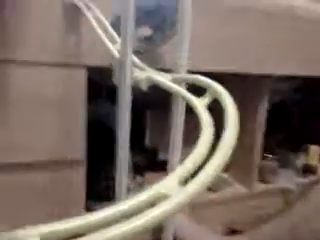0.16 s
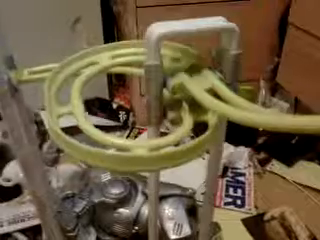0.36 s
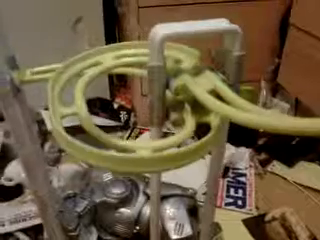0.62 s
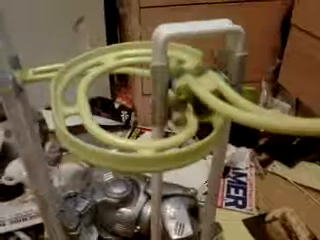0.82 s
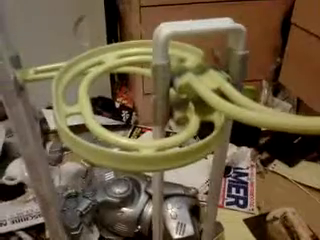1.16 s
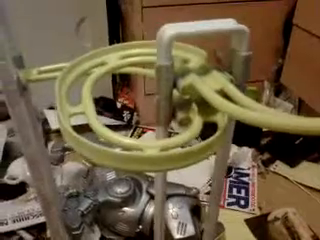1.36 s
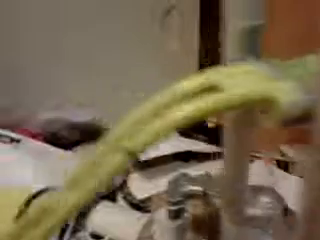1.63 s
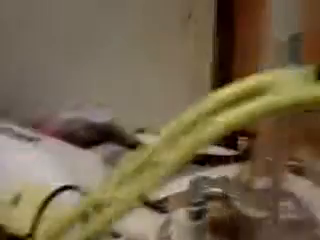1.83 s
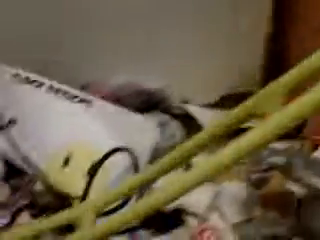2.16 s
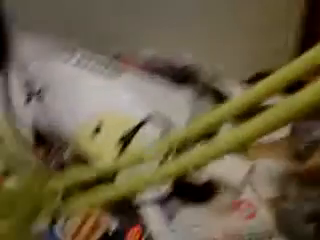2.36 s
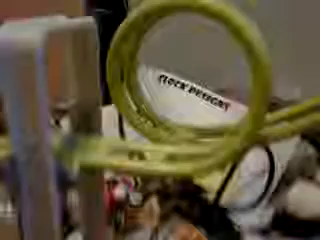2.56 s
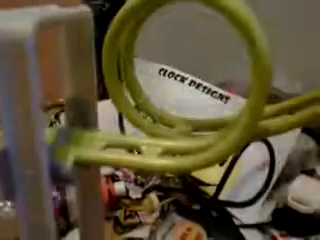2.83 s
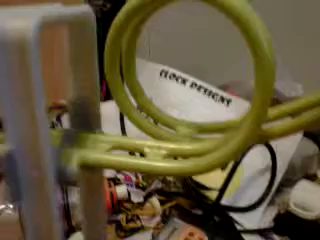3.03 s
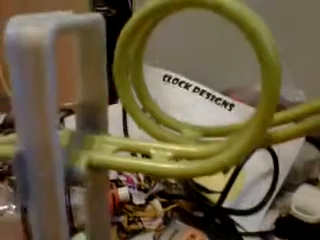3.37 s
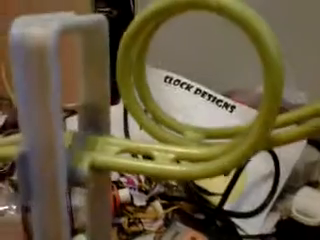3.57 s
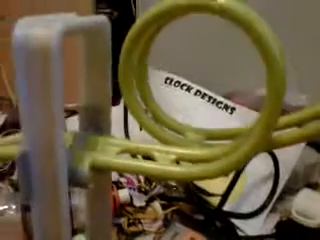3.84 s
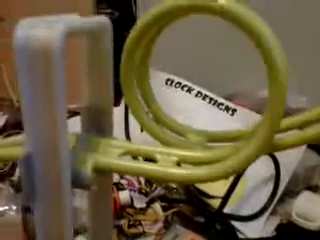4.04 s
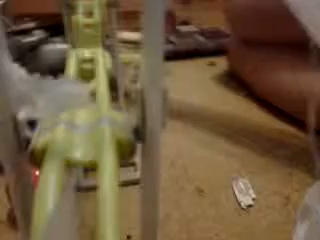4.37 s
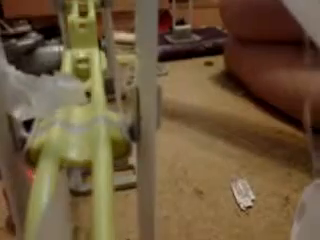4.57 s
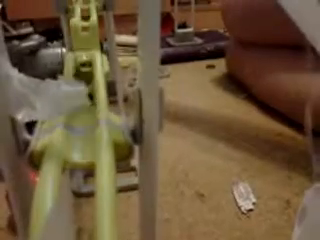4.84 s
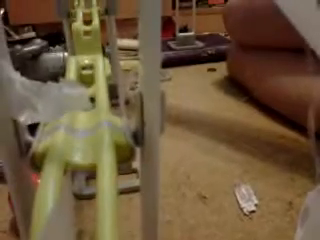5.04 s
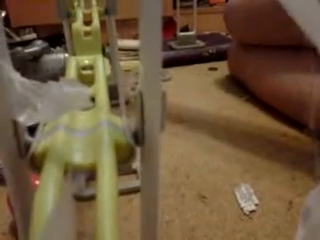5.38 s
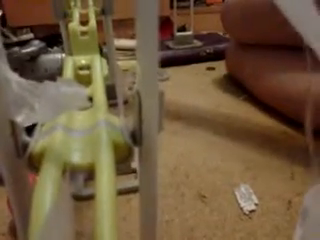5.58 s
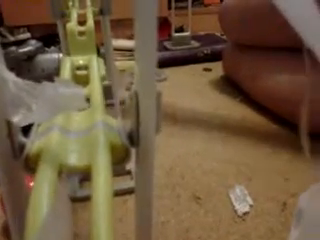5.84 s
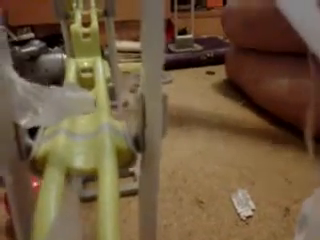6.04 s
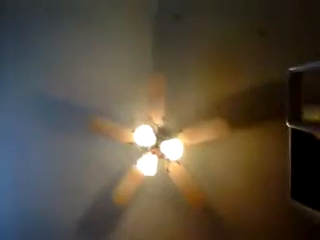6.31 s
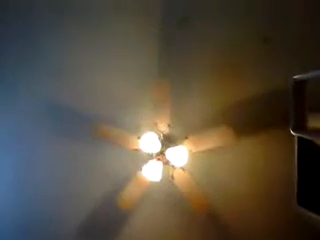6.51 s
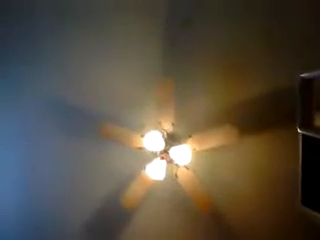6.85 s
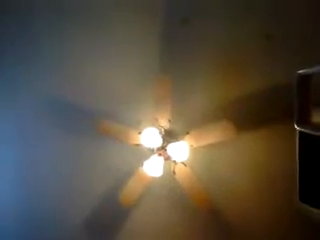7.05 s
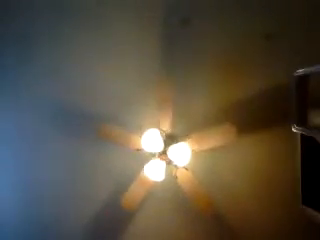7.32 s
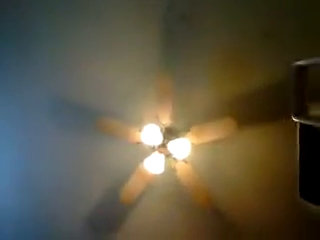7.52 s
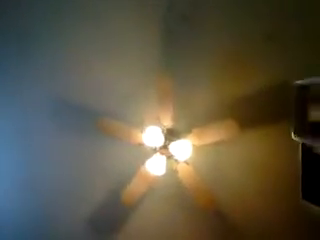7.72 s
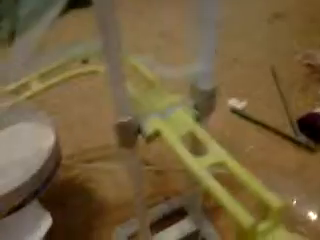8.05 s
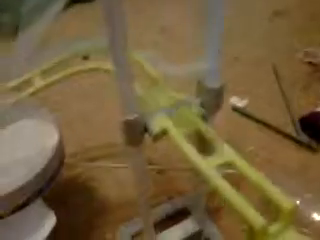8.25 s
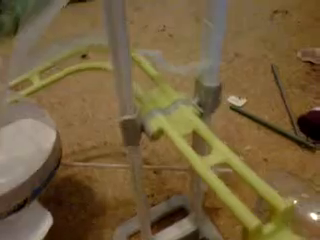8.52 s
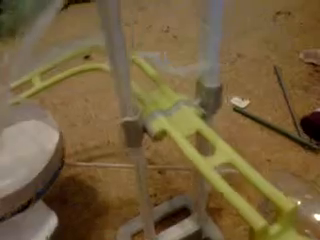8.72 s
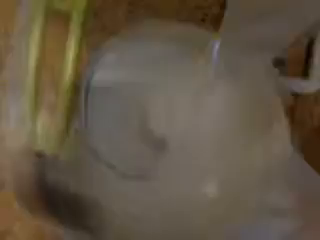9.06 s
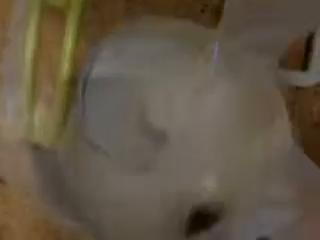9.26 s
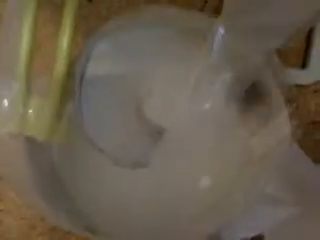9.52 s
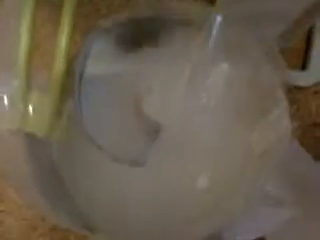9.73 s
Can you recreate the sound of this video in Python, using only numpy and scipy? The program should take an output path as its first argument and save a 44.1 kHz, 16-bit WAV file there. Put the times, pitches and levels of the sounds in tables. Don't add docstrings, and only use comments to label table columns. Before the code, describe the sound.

A small marble rumbles and clicks along a plastic rail track in a quiet room, with pops at camera cuts and hard knocks on the camera.

```python
import sys
import numpy as np
from scipy import signal
from scipy.fft import rfft, irfft
from scipy.io import wavfile
from scipy.ndimage import uniform_filter1d

SR = 44100
rng = np.random.default_rng(int(sys.argv[2]) if len(sys.argv) > 2 else 0)


def dump(signal):
    limited = np.clip(np.atleast_2d(signal).T, -1, 1)
    pcm = np.round(limited * 32767).astype(np.int16)
    wavfile.write(sys.argv[1], SR, pcm)


def field_ratio(decibels):
    return 10 ** (np.asarray(decibels, dtype=float) / 20)


N = 436149
HIT_N = 6000


def band(x, lo_hz, hi_hz, order=2):
    return signal.sosfilt(signal.butter(order, [lo_hz, hi_hz], "band", fs=SR, output="sos"), x)


def ring(x, hz, width_hz):
    return signal.lfilter(*signal.iirpeak(hz, hz / width_hz, fs=SR), x)


def casing(x, hz, width_hz):
    return ring(ring(x, hz, width_hz), hz, 1.05 * width_hz)


def unit(x):
    return x / np.sqrt(np.mean(x ** 2) + 1e-18)


def peak(x):
    return x / np.abs(x).max()


def walk(count, per_s):
    points = rng.standard_normal(int(count * per_s / SR) + 2)
    return 1.1 * np.interp(np.arange(count) * per_s / SR, np.arange(len(points)), points)


def grit(count, per_s, spread_db):
    when, sign, strength = rng.random((count, 3)).T
    hard = np.minimum(-np.log(1 - strength), 3.5)
    return (when < per_s / SR) * np.sign(sign - .5) * field_ratio(spread_db * hard)


def blow(t60, rebound=0.38):
    decay = np.exp(-np.log(1000) * np.arange(HIT_N) / SR / max(t60, .003))
    x = grit(HIT_N, 2500, 2.5) * rebound * decay
    x[0] = 1.25
    return x


def shots():
    edges = [0] + [int((r[0] - .003) * SR) for r in RESTARTS[1:]] + [N]
    return list(zip(edges, edges[1:]))


def place_at(s):
    return sum(a <= s * SR for a, _ in shots()) - 1


# frequency in Hz, level in dB per Hz.
AIR = [(24, -29), (40, -12), (86, 0), (342, -10), (399, -6), (720, -11), (3720, -23), (5280, -27.5),
       (7500, -11.5), (9750, -50), (16500, -120)]
AIR_DB = -67.5


def air():
    log_hz = np.log(np.arange(N // 2 + 1) * SR / N + 1)
    hz, db = np.array(AIR).T
    shape = field_ratio(np.interp(log_hz, np.log(hz), db))
    return field_ratio(AIR_DB) * unit(irfft(rfft(rng.standard_normal(N)) * shape, N))


def room_echo():
    t60_s, treble_t60_s, top_hz, floor_echo_s = 0.17, 0.13, 3000, 0.0061
    t = np.arange(int(.4 * SR)) / SR
    noise = rng.standard_normal(len(t)) * np.clip(t / 0.0021, 0, 1)
    tail = band(noise, 120, top_hz, order=1) * field_ratio(-60 * t / t60_s)
    tail += 0.45 * band(noise, 120, top_hz, order=1) * 0 + 0.45 * noise * field_ratio(-60 * t / treble_t60_s)
    tail = tail / np.sqrt(np.sum(tail ** 2))
    tail[int(floor_echo_s * SR)] += .35
    return tail


# frequency in Hz, width in Hz, level in dB.
TRACK = [
    [(403, 21, 13), (660, 310, 73), (1360, 290, -1), (2930, 33, 60), (3800, 110, 20), (5200, 150, 20)],
    [(430, 9.3, -15), (1215, 8.3, -2), (1660, 210, -8), (2760, 25, -23), (4130, 65, -12), (872, 27, 7),
     (615, 17, 30)],
    [(558, 61, 27.5), (1226, 33, 24.5), (1850, 9.3, -30), (2500, 270, -19), (4800, 61, -56)],
    [(1370, 60, 22.5), (1970, 64, 14.5), (3060, 35, 13), (5410, 200, 5.5)],
    [(337, 330, 24.5), (1190, 480, 20.5), (1403, 24, 28.5), (2860, 270, -2), (5170, 460, -48)],
    [(712, 110, 19.5), (1360, 22, 24.5), (1700, 33, 3), (2290, 65, 4), (3870, 230, 6.5)],
    [(621, 110, 43), (3930, 150, -19)],
]


def track(x, place, widen=2.5):
    return sum((-1) ** k * field_ratio(db) * ring(x, hz, widen * width_hz + 25)
               for k, (hz, width_hz, db) in enumerate(TRACK[place]))


THUD_DB = (-10.5, -9.5, -8.5, -11, -13, -12, -7)
# glassy tick of the marble in dB re peak, at 1500 Hz.
TICK_DB = (-18, -25, -9, -18, -6.5, -16.5, -2.5)


def frame_thud_db(s, db):
    return THUD_DB[place_at(s)] - 0.16 * (db + 27.5)


def glass_tick_db(s, hz):
    return TICK_DB[place_at(s)] + 5.5 * np.log2(hz / 1500)


def knock(s, db, hz, thud_db, tick_db, wet_db):
    hit = blow(.046 + .001 * wet_db, rebound=np.clip(.95 + .02 * wet_db, .25, .95))
    hit[0] = .7
    clack = peak(ring(ring(hit, hz, .5 * hz), hz, 6.3 * hz))
    clack = clack + field_ratio(-9.5) * peak(track(hit, place_at(s), widen=0.78))
    thud = ring(ring(hit, 340, 540), 110, 460)
    tick = band(hit, 3400, 6100) + 0.6 * casing(hit, 4816, 1200)
    sound = peak(band(clack, 490, 3200)) + field_ratio(thud_db) * peak(thud) + field_ratio(tick_db - 0.5) * peak(tick)
    sound = field_ratio(db) * sound
    return s, sound, field_ratio(min(wet_db, 4)) * sound


# start in seconds, peak in dB, pitch in Hz, thud in dB re peak.
RATTLES = [(.27, -51, 2310, -15), (.367, -44.5, 1350, -11), (3.71, -36.5, 2130, -36),
           (3.727, -37.5, 3080, -19), (4.496, -52.5, 1200, 16.5), (4.777, -32, 2587, -1),
           (5.224, -20, 1374, -23.5), (5.242, -35, 1456, -5.5), (5.258, -25.5, 2620, -28.5),
           (5.436, -28.5, 915, 2.5), (5.515, -41, 950, 4), (6.058, -39.5, 1270, -2), (6.064, -40, 2030, -3),
           (6.079, -45, 1342, -9), (7.481, -42, 3420, -24.5), (7.494, -38.5, 2560, -29),
           (3.748, -40, 2800, -21), (8.489, -38, 1980, -39), (8.513, -28.5, 1960, -10.5),
           (8.71, -33.5, 1970, -17), (8.73, -38.5, 1360, -17), (9.238, -51.5, 3200, -9),
           (9.479, -48, 806, -3.5)]


def rattles():
    return [knock(s, db, hz, thud_db, glass_tick_db(s, hz), -19) for s, db, hz, thud_db in RATTLES]


# start in seconds, peak in dB, pitch in Hz, room share in dB.
JOINTS = [(.286, -44, 1450, -12), (0.498, -36, 1010, -2.5), (0.944, -45, 727, 12), (.977, -41.5, 719, 2.5),
          (1.395, -39.5, 1350, -2.5), (1.431, -41, 937, -6.5), (2.021, -44, 1200, 0),
          (2.048, -45, 640, 7.5), (2.52, -45, 1750, -3), (2.718, -33, 640, -8), (2.968, -29.5, 2510, -12),
          (3.16, -30.5, 620, -8), (3.227, -41, 2910, -3.5), (3.482, -38, 1080, -1.5),
          (3.567, -38, 2740, -2.5), (4.675, -28, 1370, -14), (5.127, -31.5, 1380, 7),
          (5.212, -24.5, 1940, -14.5), (7.009, -30.5, 2580, -5.5), (7.531, -30, 2550, -21),
          (8.55, -35.5, 1360, 16), (8.694, -27, 1390, -27)]


def joints():
    return [knock(s, db, hz, frame_thud_db(s, db), glass_tick_db(s, hz), wet_db)
            for s, db, hz, wet_db in JOINTS]


# start in seconds, peak in dB, pitch in Hz, tick in dB re peak,
# room share in dB.
LANDINGS = [
    (.374, -35.5, 1190, -43, -50),
    (2.744, -30, 1750, -6, -16),
    (2.8, -30.5, 1720, -5, -13),
    (3.248, -28.5, 2500, 1, -6.5),
    (3.416, -22.5, 2500, -1, -8.5),
    (3.863, -24, 1850, -6, -5),
    (4.477, -24.5, 1500, -6.5, -47),
    (6.125, -28, 1850, -36, -24),
    (7.2907, -23, 2580, -3.5, -6.5),
    (8.391, -22.5, 1466, -10, -4.5),
]


def landings():
    return [knock(s, db, hz, frame_thud_db(s, db), tick_db, wet_db) for s, db, hz, tick_db, wet_db in LANDINGS]


# time in seconds, pop in dB, dip before it in dB, fall time in ms.
RESTARTS = [
    (0.4008, -22.5, -29.5, 1),
    (1.6602, -23, -39, 0.82),
    (2.8209, -22.5, -52, 0.77),
    (4.5226, -22.5, -34, 0.87),
    (6.4205, -22.5, -38.5, 0.83),
    (8.0429, -32.5, -23.5, 3.7),
    (9.2215, -27.5, -23, 2.8),
]


def pops():
    out, ms = np.zeros(N), np.arange(-1200, 9000) / SR * 1000
    after = np.clip(ms, 0, None)
    dip = (ms > -4.1) * np.exp(-np.clip(ms + 4.1, 0, None) / 1.4)
    tick = (ms > -24.3) * np.exp(-np.clip(ms + 24.3, 0, None) / 1.3)
    rise = np.exp(ms / 1.2) * (ms > -4.1)
    for s, db, dip_db, fall_ms in RESTARTS:
        fall = 1.3 * np.exp(-after / fall_ms) - .29 * np.exp(-after / 4.5) - .01 * np.exp(-after / 150)
        spike = np.where(ms < 0, rise, fall)
        i = int(s * SR) - 1200
        out[i:i + len(ms)] += field_ratio(db) * spike - field_ratio(dip_db) * dip - field_ratio(-41) * tick
    return uniform_filter1d(out, size=9)


# start
# in seconds, time the fade-out begins in seconds, level at start in dB, level as the fade-out # begins in dB.
RUNS = [(0.411, 0.93, -44.5, -53), (0.956, 1.06, -41, -51.5), (1.092, 1.405, -51.5, -48.5),
        (1.374, 1.46, -48, -48.5), (1.488, 1.654, -57.5, -41.5), (1.658, 2.24, -67.5, -61.5),
        (2.02, 1.86, -66, -46), (2.142, 2.556, -69.5, -39.5), (2.56, 2.68, -49, -42),
        (2.816, 3.04, -57.5, -43.5), (2.98, 3.09, -59, -44.5), (3.27, 3.08, -62, -66),
        (3.43, 3.74, -48.5, -53.5), (3.91, 4.34, -62.5, -70.5), (4.518, 4.78, -44.5, -43.5),
        (4.892, 5.5, -59, -53), (5.066, 5.246, -35, -39), (5.42, 6.04, -56.5, -55.5),
        (6.057, 6.405, -58.5, -70), (6.73, 7.003, -62.5, -42.5), (6.975, 7.181, -52.5, -42.5),
        (7.274, 7.292, -40, -69.5), (7.47, 7.5, -51.5, -42), (7.545, 7.777, -48.5, -43),
        (7.914, 7.56, -58, -46), (8.04, 8.09, -45, -39), (8.203, 8.2, -42, -43), (8.435, 8.7, -39, -42),
        (8.941, 9.2, -60, -59.5), (9.427, 9.84, -52, -52.5)]


def rails_level():
    touch_db_per_s, lift_db_per_s = 1496.5, 260.5
    t, out = np.arange(N) / SR, np.full(N, -120.)
    for start, end, first_db, last_db in RUNS:
        a, b = shots()[place_at((start + end) / 2)]
        db = np.interp(t[a:b], [start, end], [first_db, last_db])
        db -= touch_db_per_s * np.clip(start - t[a:b], 0, None)
        db -= lift_db_per_s * np.clip(t[a:b] - end, 0, None)
        out[a:b] = np.maximum(out[a:b], db)
    return out


RAILS_HZ = 864, 1350, 1500, 1750, 1450, 1600, 770
# frame rumble in dB re rails, for a run at -50 dB.
FRAME_DB = (-13, -12.5, -8, -9, -11.5, -11.5, -11)
# contact hiss in dB re rails, for a run at -50 dB.
HISS_DB = (-15, -9.5, 0.5, -7.5, -2, -15, -26)
MODES_DB = (-14, -4.5, -13, -10.5, -12.5, -14.5, -7.5)


def rolling():
    frame_hz, hiss_hz = 400, 3200
    port_hz, port_db, port_octaves = 5200, 4.5, 0.066
    rails_db = rails_level()
    place = np.repeat(np.arange(len(TRACK)), [b - a for a, b in shots()])
    frame_db = np.take(FRAME_DB, place) + 0.38 * (rails_db + 50) - 50
    hiss_db = np.take(HISS_DB, place) + 1.3 * (rails_db + 50) - 50

    def db_at(hz, mid_hz, now):
        low = np.clip(np.log(mid_hz / hz) / np.log(mid_hz / frame_hz), 0, 1)
        high = np.clip(np.log(hz / mid_hz) / np.log(hiss_hz / mid_hz), 0, 1)
        outside_db = 6.5 * max(np.log2(frame_hz / hz), 0) + 18.6 * max(np.log2(hz / hiss_hz), 0)
        outside_db -= port_db * np.exp(-(np.log2(hz / port_hz) / port_octaves) ** 2)
        blend_db = (1 - low - high) * rails_db[now]
        blend_db = blend_db + low * (frame_db[now] + 3.5) + high * (hiss_db[now] + 0.5)
        return blend_db - outside_db - 7.0

    seams = field_ratio(6.5) * grit(N, 120, 3.2)
    rough = (grit(N, 4000, 2.8) + seams) * field_ratio(1.5 * walk(N, 45))
    out = np.zeros(N)
    for modes, modes_db, mid_hz, (a, b) in zip(TRACK, MODES_DB, RAILS_HZ, shots()):
        now = slice(a, b)
        for k, hz in enumerate(110 * 2 ** (np.arange(25) / 4.2)):
            level_db = db_at(hz, mid_hz, now) + 2.5 * walk(b - a, 25)
            out[now] += (-1) ** k * field_ratio(level_db) * unit(ring(rough[now], hz, .18 * hz))
        for hz, width_hz, _ in modes:
            level_db = db_at(hz, mid_hz, now) + 3.5 * walk(b - a, 8) + modes_db - min(hz, 2500) / 500
            out[now] += field_ratio(level_db) * unit(ring(rough[now][::-1], hz, width_hz + 30))
    return out


# start in seconds, peak in dB, pitch in Hz, length in ms,
# room share in dB.
SKIDS = [(.49, -49.5, 5200, 24, -4), (.672, -53, 4970, 25, -7), (.96, -52, 4970, 17, -10),
         (4.7436, -24, 2500, 7.9, -6), (4.749, -21, 3060, 10.4, -12), (4.75, -25.5, 1400, 9.1, -10),
         (4.754, -35, 5200, 10, -12), (4.9056, -12, 3000, 7.2, -15), (4.9064, -21.5, 487, 6, -12),
         (4.9115, -13, 2230, 6.2, -10.5), (4.916, -20.5, 441, 6, -7), (4.925, -28, 2325, 6, -9),
         (4.9445, -20, 3060, 12, -12), (4.946, -25.5, 1380, 10, -6), (4.974, -31.5, 2500, 7.7, -7),
         (4.984, -27.5, 3060, 8.7, -12), (4.985, -28.5, 1500, 9.9, -11), (4.993, -22.5, 646, 11.3, -12),
         (4.9928, -23, 1800, 6.8, -14), (5.045, -25.5, 440, 14, -6), (5.055, -30, 1790, 5, -9),
         (5.085, -19.5, 1410, 14, -16), (5.089, -20, 2780, 5, -14), (5.115, -30, 2700, 4, -5),
         (7.5757, -23, 4080, 10.7, -6.5), (7.577, -27, 1790, 7.6, -5), (7.596, -30, 1900, 3.5, -3.5),
         (7.628, -29, 1500, 9, -5), (7.676, -30.5, 1600, 6, -7.5), (8.133, -31, 685, 12, -10.5),
         (8.134, -38, 2370, 8, -9), (8.225, -34, 3040, 8.4, -4.5), (8.39, -26, 4200, 6, -7),
         (8.455, -33.5, 1600, 13, -14)]


def skids():
    for s, db, hz, length_ms, wet_db in SKIDS:
        part = np.arange(HIT_N) / SR * 1000 / max(length_ms, 1)
        slips = grit(HIT_N, 9000, 2.0) * np.sin(np.pi * np.clip(part, 0, 1) ** .55)
        mode = peak(casing(slips, hz, .17 * hz + 300))
        boom = field_ratio(min(1500 / hz, 3) * 4.5 - 13.5) * peak(ring(slips, 110, 200))
        scrape = field_ratio(-9.5) * (peak(band(slips, 600, 5500)) + boom)
        yield s, field_ratio(db) * (mode + scrape), field_ratio(db + min(wet_db, 4)) * (.4 * mode + 1.56 * scrape)


# start in seconds, peak in dB, pitch in Hz, thud in dB re peak,
# rattle T60 in seconds.
BUMPS = [(4.56, -37.5, 260, -20, 0.019), (4.781, -35.5, 257, -10, 0.02), (3.418, -46.5, 120, -15, 0.044),
         (4.757, -33.5, 348, 5, 0.02), (5.293, -32, 276, 3.5, 0.031), (5.462, -32.5, 212, -11, 0.0067),
         (5.518, -47, 277, -7, 0.019), (6.038, -38, 245, -12.5, 0.0083), (7.104, -24, 1162, -32, 0.014),
         (7.2047, -10.5, 1280, -37, 0.0034), (7.207, -8.5, 1010, -45, 0.012),
         (7.307, -2.5, 1060, -21, 0.028), (7.341, -14, 1120, -15.5, 0.037), (7.393, -51, 1050, -4.5, 0.11),
         (7.4577, -0.5, 1450, -22, 0.017), (7.9665, -13.5, 1095, -19, 0.035)]


def bumps():
    out = np.zeros(N)
    for s, db, hz, thud_db, t60 in BUMPS:
        hit = -blow(t60, rebound=0.31)
        shell = casing(hit, 0.96 * hz, 0.77 * hz) + 0.56 * casing(hit, .7 * hz, 0.16 * hz)
        kick = peak(casing(hit, 310, 400) + 1.2 * ring(ring(hit, 85, 150), 260, 370))
        edge = field_ratio(3.5 * db - 12) * peak(band(hit, 2000, 5500))
        edge[2:18] -= field_ratio(8 * db - 1) * np.hanning(16)
        body = band(peak(shell) + field_ratio(thud_db + 11.0) * kick, 20, hz + 1100, order=3)
        i = int(s * SR)
        out[i:i + HIT_N] += field_ratio(db) * (body + edge)
    return out


# delay in seconds, level in dB re room share.
MIRRORS = [(.0061, -8), (.0097, -7), (.0028, -7.5)]
# start in seconds, peak in dB, pitch in Hz, tick in dB re peak,
# room share in dB.
SNAPS = [(5.0443, -14, 1779, -14, -9), (5.0446, -11.5, 3350, -16, -9.5), (5.3777, -3, 1668, -20, -9.5),
         (5.4215, -32, 1500, -10, -20), (6.5267, -28, 1700, -9, -18), (6.6908, -31.5, 1034, 5, -16),
         (7.7464, -31, 1600, -13, -12), (7.7587, -24, 1500, -19, -19), (7.7745, -32, 3300, -16, -12),
         (7.7756, -26.5, 1900, -15, -16), (7.7934, -33, 2800, -14, -22), (7.9086, -14.5, 1700, -11, -5.5),
         (7.9842, -27, 1700, -10, -28), (7.9948, -28.5, 1700, -13, -25), (8.0052, -27, 1700, -13, -25),
         (8.0136, -26, 1700, -12, -13), (8.8462, -13, 1600, -26, -6), (9.3166, -14, 847, -18.5, -5)]


def snaps():
    for s, db, hz, tick_db, wet_db in SNAPS:
        hit, loose = blow(0.026, rebound=.1), blow(0.046, rebound=.8)
        for delay_s, echo_db in MIRRORS:
            hit[int(delay_s * SR)] += field_ratio(min(echo_db + wet_db + 4, 0))
        body = peak(casing(hit, hz, .75 * hz)) - field_ratio(-10) * peak(casing(hit, 1.753 * hz, .6 * hz))
        rattle = field_ratio(min(wet_db, 0) - 6.5) * peak(band(loose, .3 * hz, min(2.1 * hz, 5000)))
        thud = field_ratio(-16) * peak(ring(ring(loose, 300, 500), 120, 400))
        tick = field_ratio(tick_db) * peak(casing(hit, 4770, 1300))
        sound = field_ratio(db) * (peak(body) + tick + thud + rattle)
        yield s, sound, field_ratio(min(wet_db, 4)) * (0.45 * sound + field_ratio(db + 6) * rattle)


# level in dB, pitch in Hz, width in Hz.
CHATTER = [
    (-31, 1100, 880),
    (-28, 1140, 760),
    (-41, 1050, 440),
]
# start in seconds, end in seconds.
CHATTER_S = [
    (7.076, 7.097),
    (7.165, 7.227),
    (7.345, 7.364),
]


def chatter():
    out = np.zeros(N)
    for (start, end), (db, hz, width_hz) in zip(CHATTER_S, CHATTER):
        a, b = int(start * SR), int(end * SR)
        slips = np.concatenate([grit(b - a, 1300, 2.7), np.zeros(600)])
        shell = unit(casing(casing(slips, hz, width_hz), hz, 2 * width_hz))
        hollow = unit(casing(slips, 343, 320))
        out[a:b + 600] += field_ratio(db) * unit(shell + 0.56 * hollow)
    return out


def contacts():
    near, far = np.zeros(N + HIT_N), np.zeros(N + HIT_N)
    for s, sound, feed in [*rattles(), *joints(), *landings(), *skids(), *snaps()]:
        i = int(s * SR)
        near[i:i + HIT_N] += sound
        far[i:i + HIT_N] += feed
    return near[:N], far[:N]


def scene():
    near, far = contacts()
    roll = rolling()
    feed = far + field_ratio(-14.5) * roll
    wet = np.concatenate([signal.fftconvolve(feed[a:b], room_echo())[:b - a] for a, b in shots()])
    return (near + roll + wet + bumps() + chatter() + air() + pops())[None]


def treble_gate(x):
    quiet_db, masked_db = -101.5, -52
    hz, _, z = signal.stft(x, SR, nperseg=1024)
    power = np.abs(z) ** 2
    bands = np.repeat(power[:512].reshape(128, 4, -1).sum(axis=1), 4, axis=0)
    floor = np.maximum(field_ratio(2 * quiet_db), field_ratio(2 * masked_db) * power.sum(axis=0))
    z[:512] *= (bands > floor) | (hz[:512, None] < 3400)
    return signal.istft(z, SR, nperseg=1024)[1][:N]


def band_limit(x):
    return signal.sosfilt(signal.butter(12, 16500, fs=SR, output="sos"), x)


def record(dry):
    dull = signal.sosfilt(signal.butter(6, 5255, fs=SR, output="sos"), dry[0])
    gated = signal.sosfilt(signal.ellip(8, .5, 60, 7900, fs=SR, output="sos"), treble_gate(dull))
    excess = gated - np.clip(gated, -.69, .72)
    mix = gated - uniform_filter1d(excess, size=3)
    return band_limit(mix[None])


dry = scene()
out = record(dry)
dump(out)
```